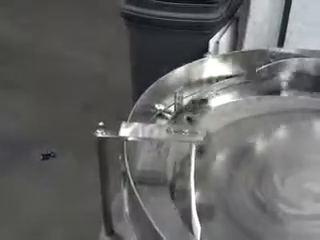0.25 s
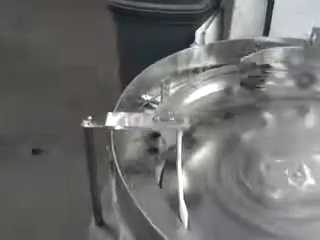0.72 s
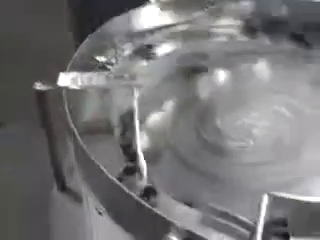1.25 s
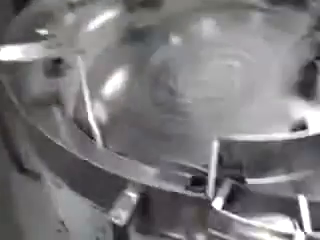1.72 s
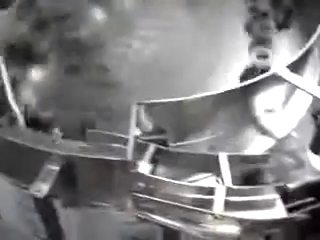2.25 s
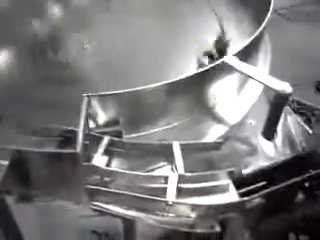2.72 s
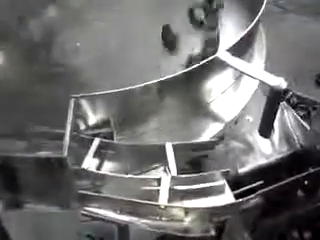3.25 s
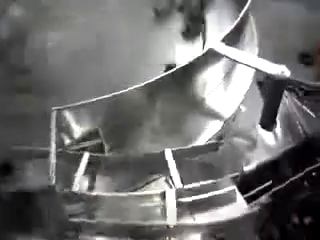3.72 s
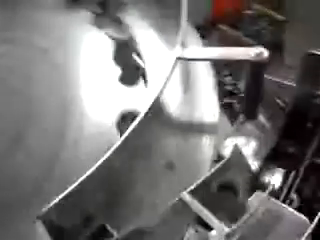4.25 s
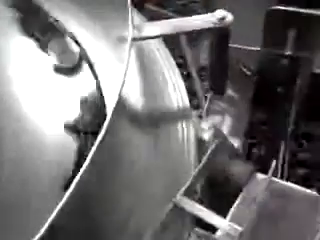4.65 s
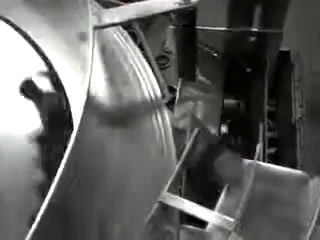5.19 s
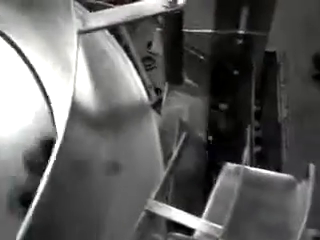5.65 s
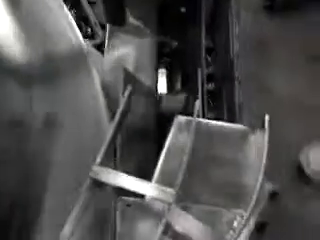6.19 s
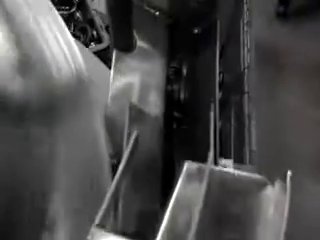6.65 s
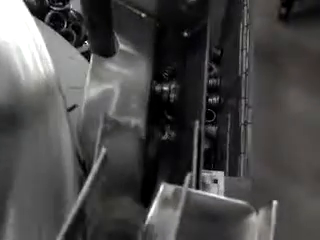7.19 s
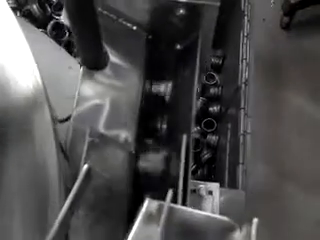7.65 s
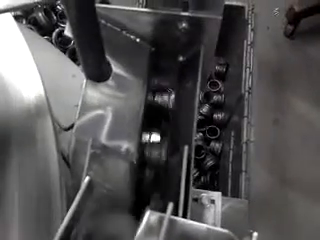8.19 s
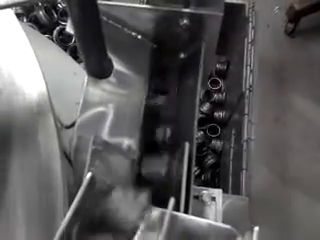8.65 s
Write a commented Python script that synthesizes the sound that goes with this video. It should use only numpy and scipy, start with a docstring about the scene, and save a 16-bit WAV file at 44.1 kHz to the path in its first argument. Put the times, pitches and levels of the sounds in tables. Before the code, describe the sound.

A busy, harsh metallic clatter in a workshop, heard very close. Rings hop and knock on thin sheet steel, jingling brightly, then drop down a chute with irregular clanks and dull knocks. The jingle swells and fades as the microphone drifts past the machine, while frame rumble and steady airy hall noise continue underneath. It ends still clattering.

```python
"""Rings in a steel bowl feeder

Metal rings shuffle round a vibrating steel bowl and drop down a chute, close to one moving microphone.
Dense noise contacts make the rattle; single hard hits are noise bursts with a knock and ring steel modes.
Loose rings and clean touches are fading sines, thuds sagging low sines, frame and hall shaped noise.
Bands alternate in step and opposed, as when one microphone feeds both channels, the right inverted and late."""
import sys
import numpy as np
from scipy import signal
from scipy.fft import rfft, irfft, next_fast_len
from scipy.io import wavfile
from scipy.ndimage import uniform_filter1d, map_coordinates

SR = 44100
rng = np.random.default_rng(int(sys.argv[2]) if len(sys.argv) > 2 else 0)


def persist_wave(psi):
    """Save psi, clipped to +-1, as 16-bit WAV."""
    counts = np.round(np.clip(psi, -1, 1) * 32767).astype(np.int16)
    wavfile.write(sys.argv[1], SR, np.atleast_2d(counts).T)


N = 392928
SPLIT_HZ = 4490  # sheet steel speaks below, the rings above

# Batches of rings surge and thin out: (time [s], sheet level [dB], jingle level [dB])
FLOW = [(0.0, -23, -30.5), (0.84, -21, -23), (1.56, -29, -36.5), (1.67, -28.5, -46), (1.86, -25.5, -26),
        (2.31, -24.5, -27.5), (2.53, -24.5, -26.5), (2.75, -29.5, -34.5), (3.03, -28.5, -34),
        (3.52, -25.5, -32.5), (3.8, -26, -32.5), (4.29, -27, -29.5), (4.57, -22.5, -24.5),
        (4.96, -24, -28.5), (5.41, -20.5, -22.5), (5.83, -26, -30), (6.25, -24, -25.5), (6.83, -29.5, -35),
        (7.12, -29.5, -31), (7.5, -23.5, -24), (7.77, -25.5, -30), (8.34, -25, -30.5), (8.54, -24, -26),
        (8.91, -22, -22)]
# The microphone drifts past the machine: (time [s], gain of base and frame [dB], gain of stirred rings [dB])
NEARNESS = [(0, -4, -7), (1.2, -2.5, 2.5), (2.8, 1.5, -26), (4.4, 1, -6), (5.3, 3, 0), (6.6, 4.5, -18),
            (7.6, 5.5, 6.5), (8.91, 0, 4.5)]
# Hard hits: (time [s], reference level [dB], jingle [dB re reference], burst t60 [s],
# drive to bowl and base [dB re reference], knock [dB re reference])
CLANKS = [(0.079, -37, 5, 0.099, 18, -12), (0.09, -11.5, -17, 0.11, -1, -13),
          (0.213, -7.5, -18.5, 0.043, -27, -15), (0.244, -4.5, -28, 0.016, -27, 1),
          (0.272, -9.5, -16, 0.069, -18, -4), (0.331, -12, -19, 0.098, -21, -14),
          (0.367, -4.5, -32, 0.088, -12, -1), (0.386, -18, -9, .05, -17, -12),
          (0.472, -14, -6.5, 0.03, -17, -2), (0.526, -8, -34, 0.021, -16, -1),
          (0.555, -19, -25, 0.055, -16, -5), (0.562, -16.5, -10, 0.46, -20, -4),
          (0.673, -10, -22, 0.049, -5, -16), (0.779, -20, -6, 0.045, -20, -9),
          (0.824, -20, -1.5, 0.055, -15, -9), (0.942, -14, -7.5, 0.047, -18, 2),
          (0.978, -9.5, -16, 0.058, -14, -12), (1.055, -9, -16, 0.033, -5, -8),
          (1.111, -10, -18, 0.31, -6, -8), (1.149, -11, -15, .05, -9, -9), (1.218, -13, -13, 0.061, -10, 2),
          (1.237, -10, -18.5, 0.092, -2.5, -11), (1.316, -11.5, -16.5, 0.042, -31, -2),
          (1.35, -8.5, -31, 0.14, -12, -13), (1.423, -11, -12.5, 0.03, -18, -3),
          (1.463, -22, -4, 0.11, -22, -14), (1.538, -9, -22.5, 0.051, -35, -1),
          (1.674, -11, -13, 0.034, -16, -5), (1.696, -6, -13.5, 0.15, -13, -17),
          (1.751, -9.5, -11.5, 0.12, -12, 0), (1.802, -15.5, -10, 0.25, -20, -14),
          (1.971, -16, -11, 0.12, -25, -11), (2.014, -8.5, -21, 0.23, -19, -13),
          (2.091, -8, -16.5, 0.065, -26, -16), (2.15, -6, -25, 0.087, -18, -14),
          (2.251, -10, -15, 0.075, -23, -9), (2.27, -10.5, -13.5, .05, -18, -14),
          (2.303, -7.5, -22, 0.1, -18, -12), (2.354, -12, -14.5, 0.14, -21, -4),
          (2.412, -6.5, -14, 0.12, -3.5, -10), (2.569, -9, -13, 0.22, -1, -8),
          (2.646, -9, -16, 0.17, -10, -14), (2.906, -2.5, -32, 0.07, -16, -1),
          (2.947, -20.5, -4, 0.078, 6, -4), (3.031, -6.5, -23, 0.029, -25, -14),
          (3.083, -7, -16.5, 0.026, -18, -20), (3.167, -6, -18, 0.044, -22, -11),
          (3.234, -16, -19, 0.028, -7, 1), (3.262, -4, -21, 0.041, -17, -4),
          (3.306, -15, -19, 0.051, -11, 5), (3.329, -9.5, -18, 0.099, -27, -4),
          (3.414, -8.5, -14, 0.081, -21, -9), (3.439, -6.5, -20, 0.23, -10, -4),
          (3.451, -14.5, -8.5, .06, -18, -12), (3.502, -8.5, -13.5, 0.12, -32, -14),
          (3.574, -10.5, -12.5, 0.18, -30, -16), (3.646, -12, -7, 0.081, 2, -11),
          (3.748, -14.5, -14, 0.046, -13, -11), (3.766, -15, -12, 0.05, -16, -10),
          (3.782, -10.5, -9.5, 0.065, -27, 0), (3.928, -13.5, -12, 0.2, -27, -3),
          (3.996, -9.5, -23, 0.38, -7.5, -2), (4.055, -15.5, -6.5, 0.1, -6, -1),
          (4.153, -2.5, -25, 0.028, -28, -6), (4.186, -7, -16.5, 0.05, -36, -3),
          (4.288, -12, -13, 0.15, -26, -14), (4.378, -8.5, -17, 0.17, -23, -16),
          (4.457, -7.5, -16, 0.051, -29, -10), (4.479, -2, -21, 0.022, -24, -14),
          (4.578, -9, -13.5, 0.076, -14, -12), (4.685, -25, -3, 0.19, 4, -13),
          (4.718, -10, -15, 0.22, 0.5, -9), (4.799, -16, -10, 0.03, -22, -9),
          (4.846, -6, -18, 0.049, -21, -5), (4.955, -8.5, -14.5, 0.26, -24, -7),
          (5.006, -2.5, -15, 0.019, -9, -9), (5.031, -7, -17.5, 0.18, -6, -23),
          (5.101, -7.5, -33, 0.064, -5, 0), (5.187, -10, -13, 0.05, -30, -3),
          (5.209, -9, -13.5, 0.23, -34, -19), (5.301, -7, -18, 0.071, -1, -15),
          (5.406, -12, -18, 0.061, -25, -3), (5.463, -9.5, -14.5, 0.056, -22, -10),
          (5.509, -7, -13.5, 0.038, -25, -11), (5.532, -10, -13.5, 0.049, -16, -12),
          (5.602, -6.5, -15, 0.09, -2, 5), (5.629, -19.5, -24, 0.055, 11, -7),
          (5.695, -9, -24, 0.074, -4, 1.5), (5.729, -8, -19, 0.1, -12, 0),
          (5.792, -7, -14.5, 0.04, -25, -2), (5.92, -7.5, -15, 0.08, -27, -6),
          (5.94, -9.5, -15, 0.14, -22, -3), (6.005, 0.5, -29, 0.036, -14, -3),
          (6.053, -10, -20.5, 0.44, -25, -7), (6.09, -16, -14.5, 0.069, -24, -9),
          (6.202, -14, -10.5, 0.063, -18, -3), (6.341, -17, -7, 0.044, -22, -9),
          (6.359, -9.5, -11.5, 0.16, -14, -14), (6.416, -8.5, -12.5, 0.2, 2, -6),
          (6.459, -2.5, -28, 0.054, -13, -22), (6.583, -4, -20, 0.086, -37, -11),
          (6.704, -13, -16.5, 0.12, -15, -13), (6.766, -8.5, -13.5, 0.075, -28, -4),
          (6.835, -14.5, -12, 0.06, -27, -6), (7.012, -11, -22, 0.091, -21, -9),
          (7.2, -20, -8.5, 0.087, -29, -7), (7.255, -10.5, -15.5, 0.074, -43, -32),
          (7.316, -6, -17, 0.24, -23, -13), (7.398, -12, -11.5, 0.083, -19, -3),
          (7.52, -9, -18, 0.085, -21, -11), (7.562, -17.5, -5.5, 0.14, -6, -7),
          (7.611, -10, -11, 0.16, -0.5, -16), (7.678, -3, -31, 0.036, -23, -9),
          (7.74, -9, -17, 0.092, -17, -9), (7.811, -6.5, -12.5, 0.062, -4.5, -16),
          (7.852, -18.5, -11, 0.048, 5, -8), (7.884, -13.5, -27, 0.032, -2, -11),
          (7.912, -4, -18.5, 0.16, -13.5, -21), (7.985, -10, -11.5, 0.12, -3, -9),
          (8.028, -12, -12.5, 0.14, -20, -9), (8.061, -9.5, -13, 0.082, -19, -14),
          (8.22, -3.5, -30, 0.026, -14, -3), (8.31, -20, -2, 0.05, -23, -5),
          (8.323, -8.5, -11, 0.15, -4, 3), (8.427, -13.5, -11.5, 0.15, -24, -10),
          (8.506, -1.5, -26, 0.025, -18, -13), (8.579, -6.5, -25, 0.085, -27, -9),
          (8.597, -9, -23.5, 0.13, -20, -13), (8.676, -5, -15, 0.057, -5, -7),
          (8.714, -13, -16, 0.061, -21, -14), (8.758, -4.5, -29, 0.038, -6, -7),
          (8.893, -8, -20, 0.093, -1, -14)]


def amp(db):
    """Decibels to amplitude."""
    return 10 ** (np.asarray(db) / 20)


def unit(x):
    """Scale to an rms of 1."""
    return x / np.sqrt(np.mean(x ** 2) + 1e-20)


def along(points, hz):
    """Read (frequency [Hz], value) points on a log frequency axis."""
    f, v = np.transpose(points)
    return np.interp(np.log(hz + 1), np.log(f + 1), v)


def curves(rows):
    """One value per sample for each column after the time."""
    s, *columns = np.transpose(rows)
    return [np.interp(np.arange(N) / SR, s, column) for column in columns]


def swing(db, scale):
    """A level curve with its swings about the mean scaled."""
    return db.mean() + scale * (db - db.mean())


def plateau(s, length, edge):
    """0 to 1 and back: rise, hold, fall."""
    corners = [s - edge, s, s + length, s + length + edge]
    return np.interp(np.arange(N) / SR, corners, [0, 1, 1, 0])


def wobble(rate):
    """A smooth random curve, rate knots a second."""
    coarse = np.arange(0, N + 64, 64)
    knots = rng.standard_normal(int(N * rate / SR) + 4)
    return np.interp(np.arange(N), coarse, map_coordinates(knots, [coarse * rate / SR]))


def filtered(x, response):
    """x times a response given as a function of frequency."""
    m = next_fast_len(N + SR // 2)
    return irfft(rfft(x, m) * response(np.fft.rfftfreq(m, 1 / SR)), m)[..., :N]


def blows(rate, spread_db):
    """Random impacts, rate a second, many weak and few strong."""
    hits = rng.random(N) < rate / SR
    return hits * amp(spread_db * np.minimum(rng.exponential(size=N), 3.5))


def contacts(rate, spread_db, t60):
    """Envelope of small impacts, each with a sudden start and a quick fade."""
    power = signal.lfilter([1], [1, -amp(-120 / (t60 * SR))], blows(rate, spread_db) ** 2)
    return unit(np.sqrt(power + 1e-12))


def bands(patchy_db):
    """Contact noise split into body and jingle, each of rms 1; its colour shifts in patches."""
    # Spectrum of a contact: (frequency [Hz], density [dB per Hz])
    colour = [(20, -78), (100, -14), (200, -5.5), (300, -11), (450, -2), (800, 1.5), (1500, 1), (2400, 1.5),
              (2900, -2.5), (4000, -13), (6000, -12), (8000, -17), (10000, -19.5), (11000, -30)]
    z = signal.stft(rng.standard_normal((2, N)), nperseg=256)[2]
    field = uniform_filter1d(rng.standard_normal(z.shape), size=4, axis=1)
    field = uniform_filter1d(field, size=6, axis=2)
    noise = signal.istft(z * amp(patchy_db * unit(field)), nperseg=256)[1][:, :N]

    def split(hz):
        low = 1 / np.sqrt(1 + (hz / SPLIT_HZ) ** 6)
        return amp(along(colour, hz)) * np.array([low, np.sqrt(1 - low ** 2)])

    return [unit(band) for band in filtered(noise, split)]


def rattle():
    """Rings hop and collide; bowl and rings share the timing of their contacts."""
    body_db, jingle_db = curves(FLOW)
    body, jingle = bands(patchy_db=2.5)
    shared = contacts(rate=200, spread_db=2.8, t60=0.06)
    ticks = contacts(rate=130, spread_db=5, t60=0.01)
    sheet = amp(body_db) * (0.5 + 0.24 * shared + 0.11 * ticks) * body
    rings = amp(jingle_db) * (0.025 + 0.63 * shared + 0.21 * ticks) * jingle
    return sheet + rings


def chimes():
    """Loose rings touch and sing briefly, each a fading sine at a pitch of its own."""
    rate, gain_db = 200, -9.5  # chimes a second; dB relative to the flow, before the random strength
    middle_hz, reach_octaves, mean_t60 = 3190, 2.2, 0.12
    luck = rng.random((int(rate * N / SR), 4))  # columns: time, pitch, strength, fade
    t = np.arange(SR // 20) / SR
    at = (luck[:, 0] * N).astype(int)
    hz = np.minimum(middle_hz * 2 ** (reach_octaves * (2 * luck[:, 1:2] - 1)), SR / 3)
    body_db, jingle_db = curves(FLOW)
    flow_db = np.where(hz[:, 0] < SPLIT_HZ, body_db[at], jingle_db[at])
    strength_db = -3.9 * np.log(luck[:, 2] + 0.06)  # few strong
    peak = amp(flow_db + gain_db + strength_db)[:, None]
    fade = amp(-60 * t / (mean_t60 * (.5 + luck[:, 3:]))) * (1 - t / t[-1])
    tones = peak * fade * np.sin(2 * np.pi * hz * t)
    return np.bincount((at[:, None] + np.arange(len(t))).ravel(), tones.ravel())[:N]


def ringing():
    """Small contacts and hard hits drive damped modes; each hit reaches each mode with its own strength."""
    # Modes of bowl, rings, track, rail and base: (frequency [Hz], gain [dB], t60 [s])
    bowl_modes = [(771, -7, .15), (908, -4, .15), (1259, 1, .15), (1324, -1, .15), (1390, 0, .25),
                  (1430, 1, .17), (2292, -7, .15), (2432, -5, .17)]
    ring_modes = [(1744, 6, .15), (3212, 4, .12), (3798, 0, .25), (6170, -3, .1), (7428, -1, .12),
                  (8484, -4, .12), (9908, -2, .25), (10615, -8, .15)]
    track_modes = [(2993, -4, .1), (3380, -1, .15), (4008, -5, .1), (4315, -5, .1), (4508, -3, .1),
                   (5458, -6, .1), (5900, -5, .08), (7003, -8, .1), (7318, -8, .1), (7891, -8, .1),
                   (9153, -7, .12)]
    rail_modes = [(1765, -3, .15), (1818, 2, .2)]
    base_modes = [(336, -2, .3), (366, -4, .2), (545, -3, .2), (642, -3, .25), (905, -1, .2)]
    # Rings run along the track and make it sing: (time [s], length [s], track drive [dB], rail drive [dB])
    runs = [(0.513, 0.49, -37.5, -45), (2.154, 0.29, -37.5, -36), (3.32, 0.082, -42, -36.5),
            (4.366, 0.17, -41, -36.5), (5.24, 0.13, -37, -40), (6.042, 0.16, -40, -43),
            (7.292, 0.377, -37.5, -40), (8.013, 0.13, -47, -35.5), (8.397, 0.31, -38, -38.5)]
    # Drive by small contacts, relative to the flow: (bowl [dB], rings [dB], base [dB])
    stir_db = (-23, -23.5, -23)
    # Share of a hard hit: (bowl [dB], rings [dB], track [dB], rail [dB], base [dB])
    strike_db = (-13.5, -15.5, -17, -30, -46)
    idle_db, run_edge_s = -50, 0.046  # steady drive of track and rail; rise and fall of a run

    body, jingle = (amp(swing(db, .99)) for db in curves(FLOW))
    near_base, near_rings = amp(curves(NEARNESS))
    bowl, rings, base = amp(stir_db)
    singing = sum(amp(db)[:, None] * plateau(s, length, run_edge_s) for s, length, *db in runs)
    track, rail = amp(idle_db) + singing
    stirs = (bowl * body, rings * jingle * near_rings, track, rail, base * body * near_base)

    s, hit_db, jingle_db, _, bowl_db, _ = np.transpose(CLANKS)
    at = np.minimum(np.round(s * SR).astype(int), N - 1)
    hard = (bowl_db, jingle_db, jingle_db, jingle_db, bowl_db)
    parts = (bowl_modes, ring_modes, track_modes, rail_modes, base_modes)
    out = np.zeros(N)
    for modes, stir, hard_db, share_db in zip(parts, stirs, hard, strike_db):
        luck = rng.standard_normal((len(at), len(modes)))
        small = unit(blows(rate=700, spread_db=2)) * np.sqrt(400 / SR) * stir
        for k, (hz, db, t60) in enumerate(modes):
            push = small * rng.standard_normal(N) * amp(4 * wobble(14))
            push[at] += amp(hit_db + hard_db + share_db + 2.5 * luck[:, k])
            keep, turn = amp(-60 / (t60 * SR)), 2 * np.pi * hz / SR  # two-pole resonator
            poles = [1, -2 * keep * np.cos(turn), keep ** 2]
            out += amp(db) * signal.lfilter([np.sin(turn)], poles, push)
    # the ringing carries little bass
    return filtered(out, lambda hz: (hz / 260) ** 2 / np.sqrt(1 + (hz / 260) ** 4))


def rumble():
    """The frame shakes in lumps of low noise, harder under a full bowl, with one long shudder."""
    # Spectrum of the frame: (frequency [Hz], density [dB per Hz])
    frame_colour = [(15, -22), (60, -12), (115, 0), (300, 0), (500, -10), (1000, -50)]
    frame = filtered(rng.standard_normal(N), lambda hz: amp(along(frame_colour, hz)))
    lumps = contacts(rate=25, spread_db=5, t60=.07)
    load_db = curves(FLOW)[0]
    shake_db = -50 + 2.4 * (load_db - load_db.mean()) + curves(NEARNESS)[0]
    shudder = amp(-27) * plateau(1.71, length=0.16, edge=0.024)
    return (amp(shake_db) * lumps + shudder) * unit(frame)


def shop():
    """Machine noise of the hall: shaped noise whose level wavers slightly."""
    # Spectrum of the workshop air: (frequency [Hz], density [dB per Hz])
    air_colour = [(30, -52), (120, -35), (250, -1.5), (500, 6.5), (1500, -24), (3000, -2.5), (6000, 10.5),
                  (11000, -110)]
    air = filtered(rng.standard_normal(N), lambda hz: amp(along(air_colour, hz)))
    level_db = -37.5 + 1.1 * wobble(2.75)
    return amp(level_db) * unit(air)


def clanks():
    """Each hard hit dents the sheet with one sharp knock, while a burst of contacts dies away."""
    burst_db = -16  # sheet burst relative to the reference level
    hold, tail = 0.13, .25  # share of its t60 that a burst keeps its strength; share of its slow tail
    rise_s, knock_lag_s = .0007, .0015  # the full blow lands just after first touch
    low, high, knock = np.zeros((3, N + SR))  # low and high hold power
    t = np.arange(SR // 4) / SR
    for s, db, jingle_db, t60, _, knock_db in CLANKS:
        after = np.maximum(t - hold * t60, 0)
        fade = amp(-60 * after / t60) + tail * amp(-15 * after / t60)
        fade *= 1 - np.exp(-t / rise_s)
        low[round(s * SR):][:len(t)] += (amp(db + burst_db) * fade) ** 2
        high[round(s * SR):][:len(t)] += (amp(db + jingle_db) * fade) ** 2
        crack = np.diff(rng.standard_normal(len(t) + 1))
        dent = 0.51 * np.sin(2 * np.pi * 1250 * t) + 0.28 * crack
        knock[round((s + knock_lag_s) * SR):][:len(t)] += amp(db + knock_db - 60 * t / 0.011) * dent
    body, jingle = bands(patchy_db=2.2)
    return np.sqrt(low[:N]) * body + np.sqrt(high[:N]) * jingle + knock[:N]


def pings():
    """A clean touch leaves one mode of a ring or the steel singing on its own."""
    # Clear single notes: (time [s], pitch [Hz], starting level [dB])
    notes = [(0.329, 3360, -17), (0.329, 7370, -23.5), (0.389, 9155, -24.5), (0.395, 3400, -20.5),
             (0.508, 3377, -23), (0.557, 9130, -19.5), (0.705, 3420, -18.5), (0.773, 3377, -25),
             (0.865, 3378, -23), (0.92, 3360, -17.5), (0.921, 9149, -22), (1.093, 7900, -28),
             (1.308, 3990, -24.5), (2.353, 9020, -22), (2.57, 4006, -22), (3.646, 5464, -24),
             (4.379, 3380, -18), (4.478, 3340, -23), (4.716, 644, -20.5), (6.206, 4300, -22.5),
             (7.372, 3377, -21.5), (7.562, 9860, -19.5), (7.81, 1387, -15), (7.913, 1440, -17),
             (7.985, 1424, -18), (8.059, 9909, -26.5), (8.42, 9908, -23), (8.5, 7316, -24),
             (8.578, 3795, -26), (8.716, 3791, -23.5), (8.759, 1422, -20.5)]
    t60 = .22  # s
    out, t = np.zeros(N + SR), np.arange(SR // 4) / SR
    for s, hz, db in notes:
        out[round(s * SR):][:len(t)] += amp(db - 60 * t / t60) * np.sin(2 * np.pi * hz * t)
    return out[:N]


def thuds():
    """A soft knock: a few fast-fading swings that sag in pitch, over a one-way shove."""
    # Soft low knocks: (time [s], level [dB], starting pitch [Hz])
    knocks = [(0.374, -21, 300), (0.841, -17, 210), (1.539, -13, 260), (1.706, -16, 170), (1.751, -14, 250),
              (2.417, -20, 300), (2.571, -19, 200), (2.908, -21, 170), (3.2645, -7, 200), (3.648, -11, 200),
              (3.791, -21, 190), (4.011, -12, 300), (4.724, -13, 180), (5.032, -19, 190), (5.3, -14, 270),
              (5.404, -14, 270), (5.6, -14, 250), (6.01, -18, 170), (6.42, -20, 170), (7.562, -20, 230),
              (8.211, -11, 240), (8.323, -9, 240), (8.507, -9, 200), (8.675, -6, 300), (8.777, -14, 250),
              (8.897, -16, 300)]
    push, push_s = .04, .004  # share of the shove; time to its top
    out, t = np.zeros(N + SR), np.arange(SR // 20) / SR
    for s, db, hz in knocks:
        fade_s = 6.5 / hz  # 6.5 cycles set both the t60 and the sag
        swings = np.sin(2 * np.pi * hz * t * np.exp(-t / fade_s))
        swings *= amp(-60 * t / fade_s) * (1 - np.exp(-t / .002))
        shove = push * t / push_s * np.exp(1 - t / push_s)
        out[round(s * SR):][:len(t)] -= amp(db) * (swings + shove)
    return out[:N]


def scene():
    """Steel and hall in both channels, the deep knocks and rumble opposed."""
    bass_hz, spill = 147, .4  # the steel fades out below; share of the knocks heard through the steel
    steel = rattle() + chimes() + pings() + clanks() + ringing() + shop()
    knocks = thuds()
    low = knocks + rumble()
    steel = filtered(steel, lambda hz: 1 / np.sqrt(1 + (bass_hz / (hz + 1)) ** 8))
    steel += spill * knocks
    return np.array([steel + low, steel - low])  # too deep for the delay to matter


def record(dry):
    """Inversion and delay sort the bands in turn into in-step and opposed ones; their relative phase wanders."""
    # Added to the balance of the bands: (frequency [Hz], opposed over in-step [dB])
    lean = [(30, -32), (90, -12.5), (200, -22.5), (340, -14), (1000, -13.5), (1350, -24), (1720, 8),
            (2400, -5.5), (3000, -1)]
    late_s, top_hz, ceiling = 16 / 44100, 11020, .93
    common = dry.mean(axis=0)
    hz, _, z = signal.stft(common, SR, nperseg=1024)
    turn = np.pi * (hz[:, None] + 1) * late_s
    comb_db = 1.54 * 20 * np.log10(abs(1 / np.tan(turn)))
    opposed_db = np.clip(comb_db + along(lean, hz)[:, None], -34, 42)
    share = 1 / (1 + amp(opposed_db) ** 2)  # in-step part of the power
    drift = uniform_filter1d(rng.standard_normal(z.shape), size=40, axis=0)
    drift = 1.13 * unit(uniform_filter1d(drift, size=5))
    # the weaker part wanders most
    mid = z * np.sqrt(share) * np.sign(np.sin(turn)) * np.exp(1j * drift * (1 - share))
    side = -1j * z * np.sqrt(1 - share) * np.sign(np.cos(turn)) * np.exp(-1j * drift * share)
    pair = signal.istft(np.array([mid + side, mid - side]), SR, nperseg=1024)[1][:, :N]
    pair += dry - common
    pair = pair / (1 + abs(pair / ceiling) ** 6) ** (1 / 6)  # soft overload
    return filtered(pair, lambda hz: hz < top_hz)


dry = scene()
out = record(dry)
persist_wave(out)
```